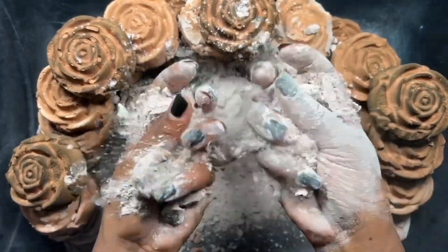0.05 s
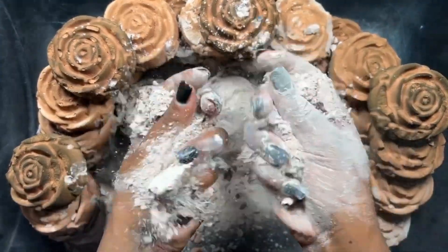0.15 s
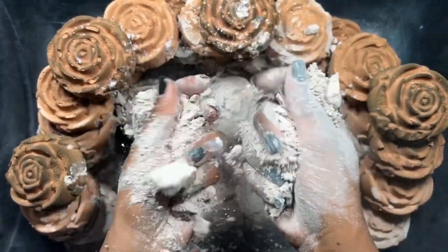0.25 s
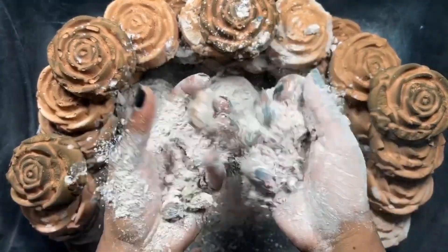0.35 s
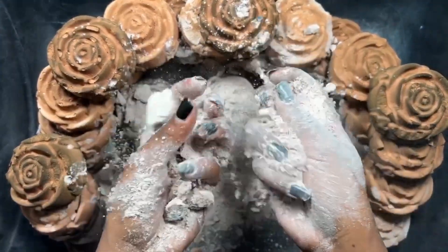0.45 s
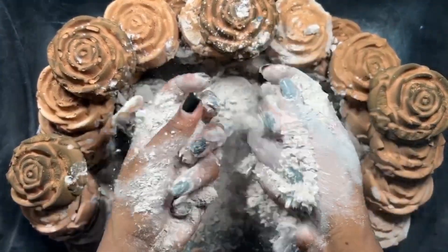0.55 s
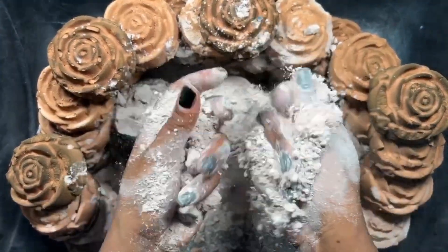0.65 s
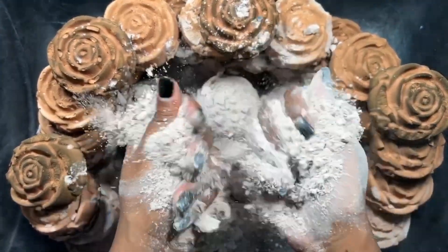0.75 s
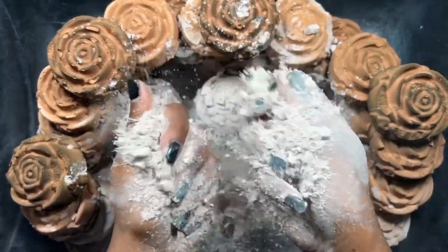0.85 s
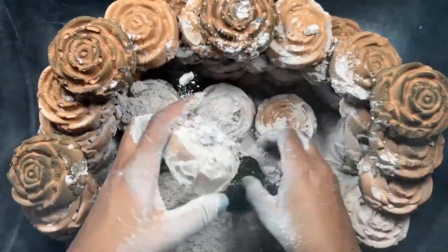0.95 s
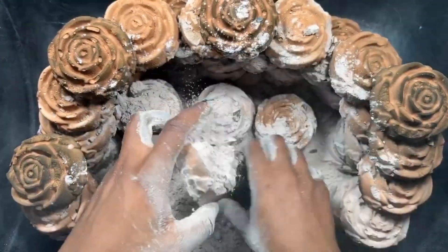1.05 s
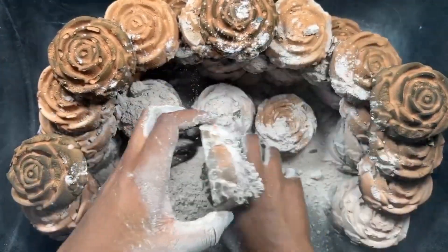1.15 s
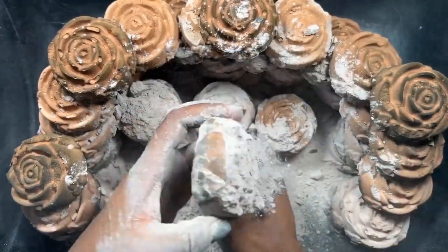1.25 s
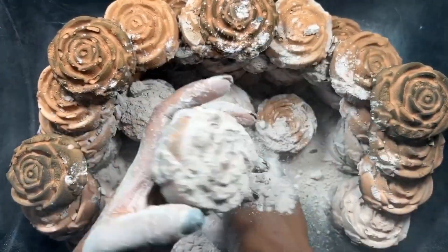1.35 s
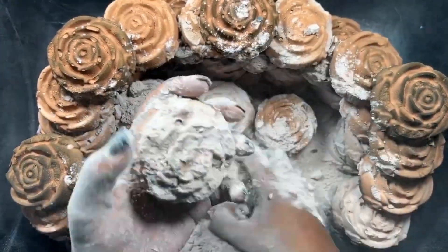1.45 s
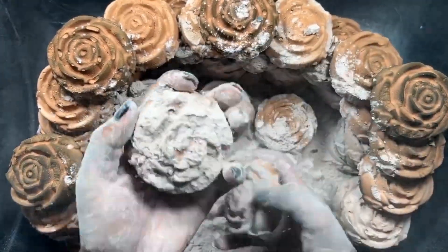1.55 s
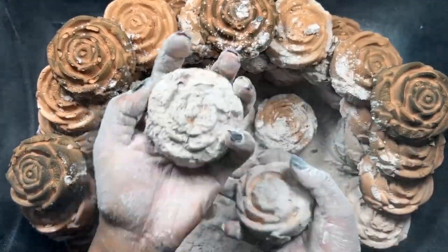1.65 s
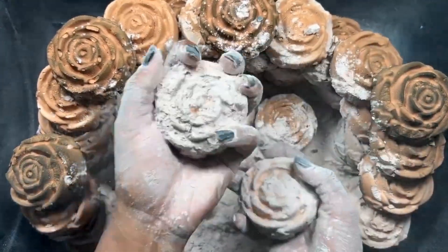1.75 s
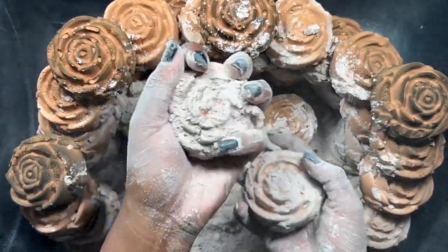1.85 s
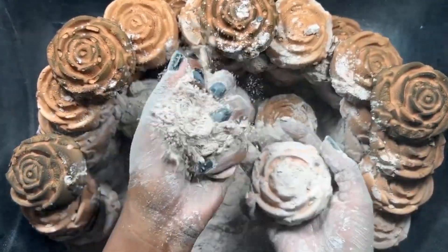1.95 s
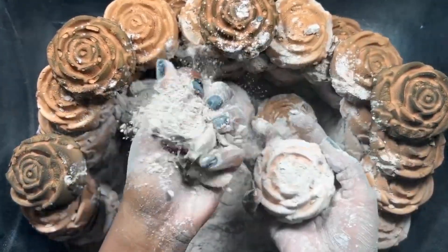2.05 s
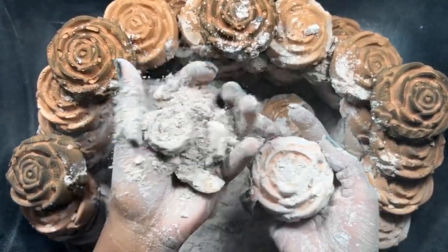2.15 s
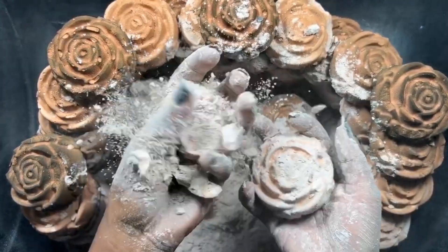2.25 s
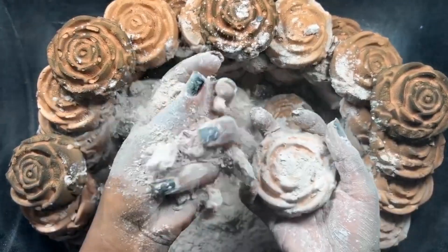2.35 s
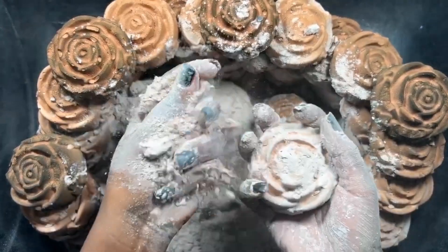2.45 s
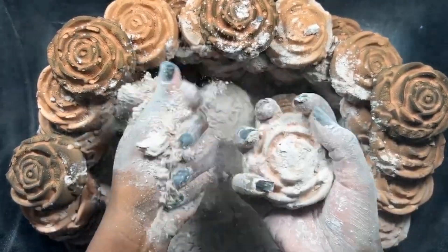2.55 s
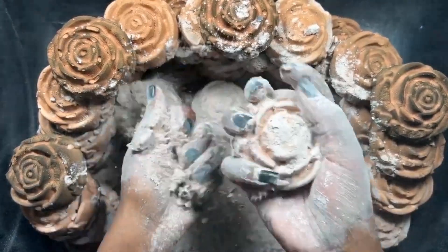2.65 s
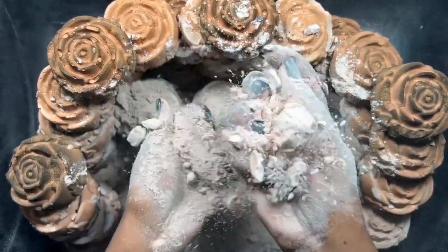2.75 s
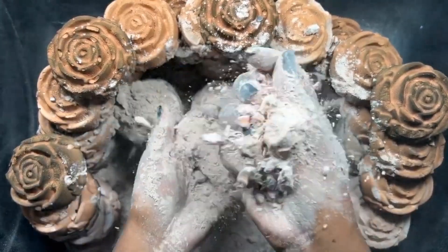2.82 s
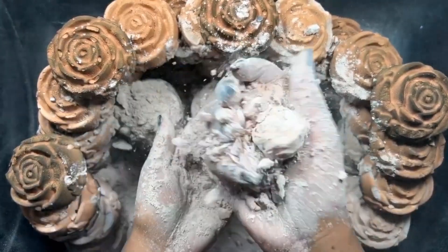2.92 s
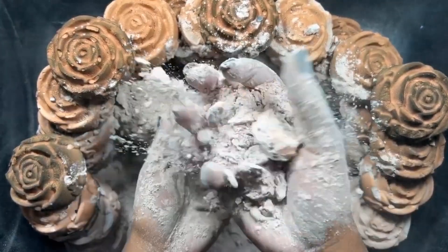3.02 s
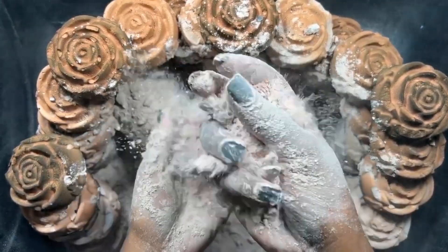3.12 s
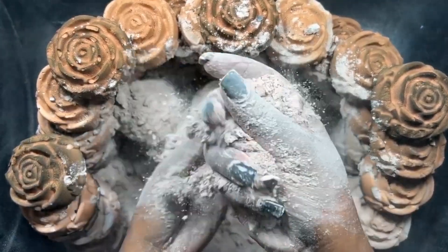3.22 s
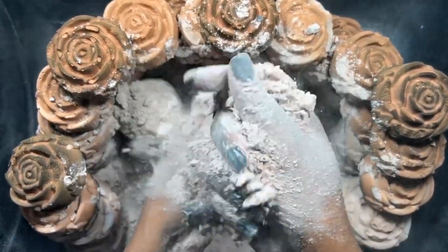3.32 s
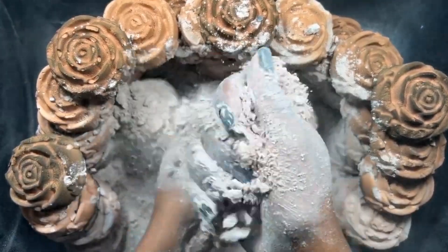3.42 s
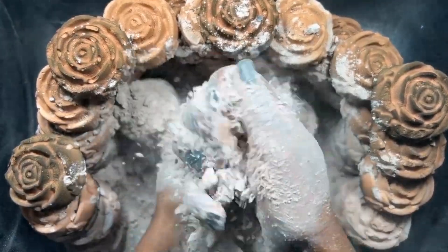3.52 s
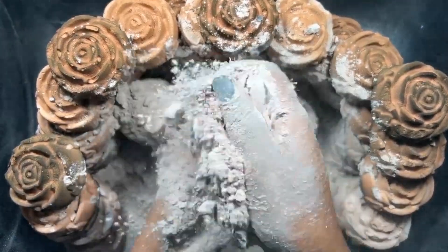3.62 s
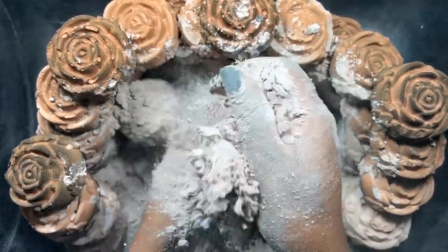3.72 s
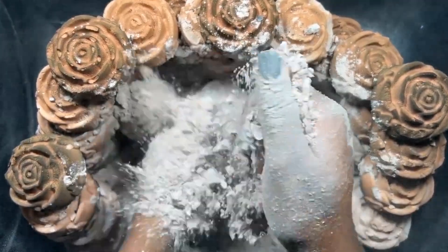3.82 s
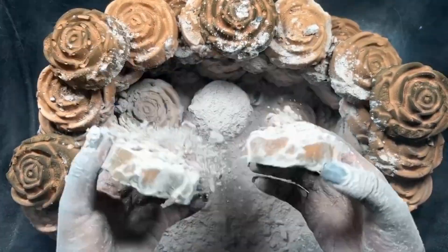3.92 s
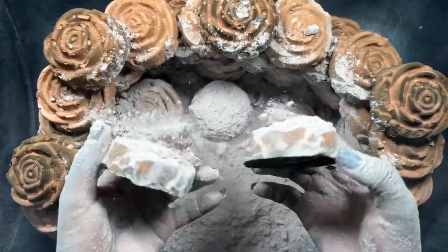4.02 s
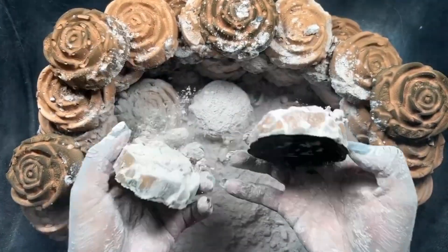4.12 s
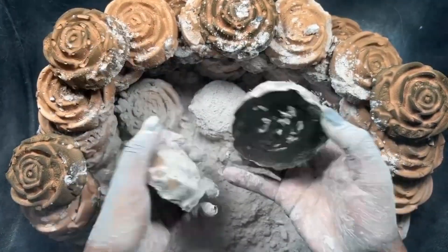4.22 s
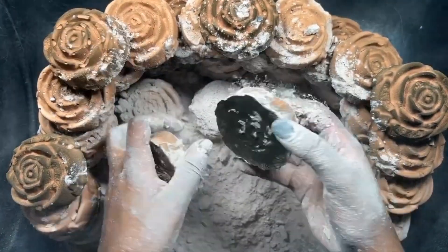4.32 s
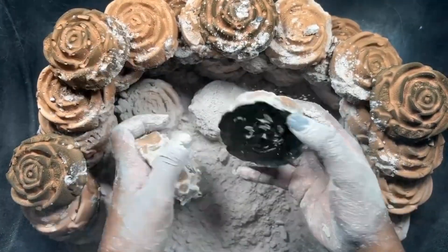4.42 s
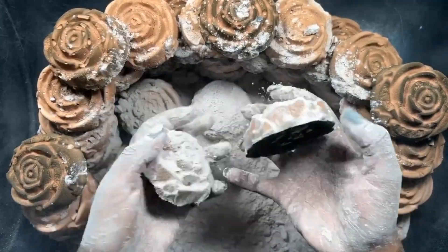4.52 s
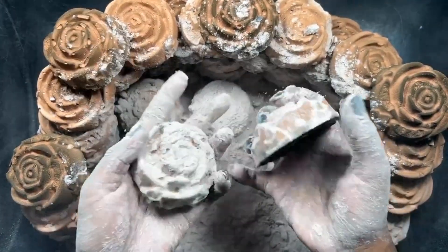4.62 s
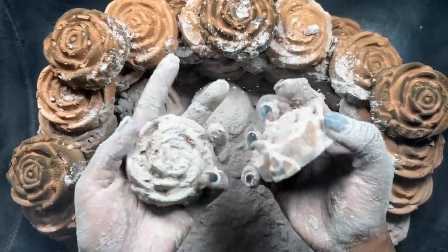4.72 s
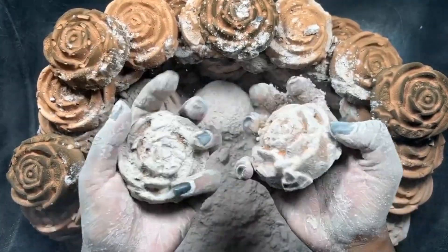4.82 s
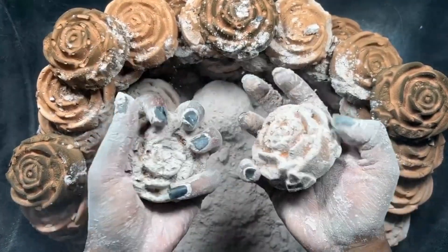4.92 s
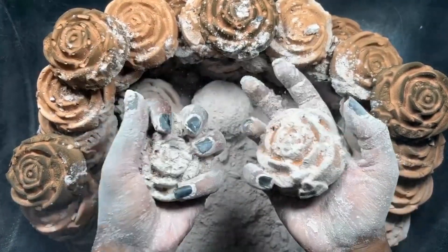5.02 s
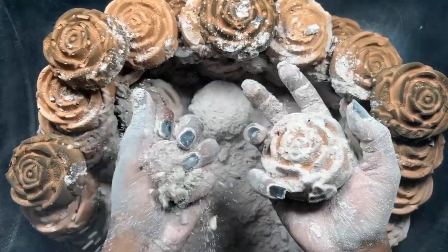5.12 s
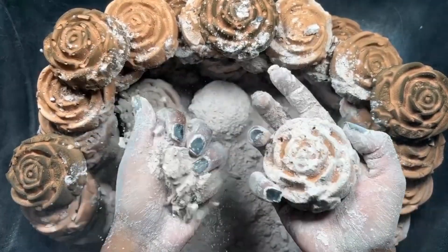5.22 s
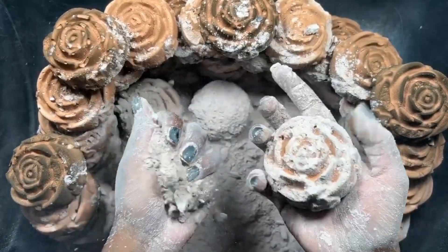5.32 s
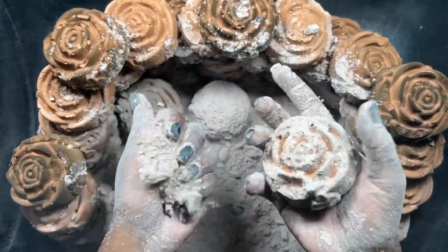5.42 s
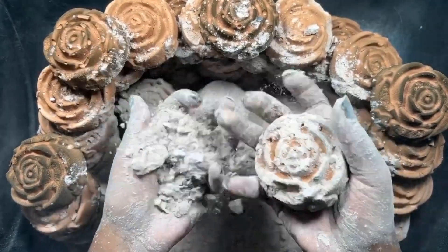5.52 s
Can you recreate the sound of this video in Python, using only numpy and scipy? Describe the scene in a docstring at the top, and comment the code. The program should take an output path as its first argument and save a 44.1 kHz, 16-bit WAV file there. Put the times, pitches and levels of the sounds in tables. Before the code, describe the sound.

Very close, dry stereo sound of hands crushing soft chalk over a table. From 0 to 0.25 s a tight cluster of loud, hollow mid-pitched cracks bursts out, with thick gritty crumbling; further strong cracks land near 0.44-0.55 and 0.9-1.0. Around 1.1-1.5 it thins to fine snaps and powder rubs. A double crack comes at 1.6, crisp ones at 1.93-1.97. From 2.1 to 2.9 the grinding rebuilds with smaller, duller knocks and a bright powdery swish at 2.7. Between 3 and 4 s, steady lower crunches cluster, densest at 3.7-4.0. From 4 to 4.9 crumbling drops away, leaving soft airy finger rubs and tiny ticks, brightest at 4.8. A sharp snap with a table thud hits at 5.07, then light crumbling fades by 5.5. Soft low thuds of falling bits, faint rumble and a slightly wavering low hum run underneath.

```python
"""At a table in a rumbling room, two hands squeeze and crumble soft chalk blocks.
Breaking lumps crack and knock as struck, damped resonances with bursts of noise; crumbs grind as
clumped random clicks ringing many small pieces; powder hisses between the fingers as dense grains
and noise, with a narrow ring from the cupped hand. Falling pieces excite the table's low modes,
over filtered-noise rumble and a slightly wavering low hum."""
import sys
import numpy as np
from scipy import signal
from scipy.fft import rfft, irfft, next_fast_len
from scipy.io import wavfile

SR = 44100
rng = np.random.default_rng(int(sys.argv[2]) if len(sys.argv) > 2 else 0)


def master_out(mix):
    """Clip the mix to full scale and print it as 16-bit PCM to the path in sys.argv[1]."""
    frames = np.transpose(np.atleast_2d(mix))
    ceiling = np.clip(frames, -1, 1)
    pcm = np.round(ceiling * 32767).astype(np.int16)
    wavfile.write(sys.argv[1], SR, pcm)


N = 245637

# Pieces dropping on the table. Each row: start in seconds, level in dB.
THUDS = [(0.047, -34), (0.441, -32.5), (0.608, -35), (0.869, -34.5), (1.928, -36.5), (1.98, -42),
         (2.558, -35), (2.701, -43), (2.859, -46), (3.141, -45), (3.569, -37), (5.066, -30.5), (5.325, -38)]
# Spectrum of sliding powder and of bright snaps. Each row: frequency in Hz, relative density in dB per Hz.
POWDER_SPECTRUM = [(700, -28), (1300, -18), (1900, -12), (2400, -14), (3200, -7.5), (5200, -7), (6200, 0),
                   (7200, -5.5), (8400, -6.5), (10200, -11), (11200, -6), (12300, -4.5), (14000, -8.5),
                   (15700, -6)]


def from_db(db):
    """Amplitude gain is ten to the power of a twentieth of the decibels."""
    return 10 ** (np.asarray(db) / 20)


def rms_one(x):
    """Normalise the mean power, so that the rms is one."""
    return x / np.sqrt(np.mean(x ** 2) + 1e-20)


def in_time(rows):
    """Linear interpolation turns table columns into curves with one value a sample."""
    s, *columns = np.transpose(rows)
    return [np.interp(np.arange(N) / SR, s, c) for c in columns]


def colour(x, points, share=1):
    """Zero-phase filtering: the spectrum is weighted by dB drawn straight over log frequency."""
    size = next_fast_len(N + 4096)
    hz = np.maximum(np.arange(size // 2 + 1) * SR / size, 1)
    point_hz, point_db = np.array(points).T
    db = np.interp(np.log(hz), np.log(point_hz), point_db)
    return irfft(rfft(x, size) * from_db(share * db), size)[:N]


def drift(rate_hz):
    """Low-passed noise of unit rms: a double pole at rate_hz leaves only slow chance."""
    step = 40  # samples between computed values
    r = np.exp(-2 * np.pi * rate_hz * step / SR)
    noise = rng.standard_normal(N // step + 2002)
    slow = signal.lfilter([1], [1, -2 * r, r * r], noise)[2000:]
    return np.interp(np.arange(N) / step, np.arange(len(slow)), rms_one(slow))


def ring(clicks, hz, t60):
    """Damped resonance: a unit click starts a sine of height near 1 that falls 60 dB in t60 seconds."""
    r = from_db(-60 / (t60 * SR))
    w = 2 * np.pi * min(hz, 15000) / SR
    return signal.lfilter([0, np.sin(w)], [1, -2 * r * np.cos(w), r * r], clicks + 1e-18)


def soft_ring(clicks, hz, cycles):
    """Cascaded resonance: two equal passes, each falling 60 dB in `cycles`, swell before dying; peak near 1."""
    slope = np.diff(clicks, prepend=0) * SR / (2 * np.pi * hz)
    once = ring(slope, hz, cycles / hz)
    return ring(once, hz, cycles / hz) * 2 * np.e * np.log(1000) * hz / (cycles * SR)


def grains(per_s, spread_db):
    """Random impulse train: independent clicks of exponentially spread dB and either sign."""
    sizes = from_db(spread_db * np.minimum(rng.exponential(1, N), 5))
    signs = rng.choice([-1, 1], N)
    return sizes * signs * (rng.random(N) < per_s / SR)


def following(squeeze_db, level_db, share):
    """Proportional coupling in dB: level_db at a middling squeeze, then a share of the squeeze's swing."""
    middling_db = -52
    return level_db + share * (squeeze_db - middling_db)


def shaking(squeeze_db):
    """Incoherent power addition: the room, the worked table and slow jolts from thuds give the rumble's dB."""
    room_db, shake_db, shake_follows = -60, -54.5, 0.67
    jolt_db, swell_s, settle_s = -14.5, 0.027, 0.27  # jolt re the thud's listed level
    t = np.arange(N) / SR
    power = from_db(room_db) ** 2 + from_db(following(squeeze_db, shake_db, shake_follows)) ** 2
    for s, db in THUDS:
        swell = np.clip((t - s) / swell_s, 0, 1)
        power += from_db(db + jolt_db) ** 2 * swell * np.exp(-np.abs(t - s) / settle_s)
    return 10 * np.log10(power)


def rumble_and_hum(rumble_db):
    """Filtered noise under a level curve makes the rumble; a phase-modulated sine makes the hum."""
    # Spectrum of the rumble. Each row: frequency in Hz, relative density in dB per Hz.
    rumble_spectrum = [(20, -35), (35, -10.5), (52, -4), (78, 3), (100, -5.5), (145, -4.5), (190, -19.5),
                       (520, -14.5), (640, -40), (900, -44), (1300, -46)]
    hum_hz, hum_db = 121.2, -59
    low = rms_one(colour(rng.standard_normal(N), rumble_spectrum))
    phase = 2 * np.pi * hum_hz * np.arange(N) / SR + 0.39 * drift(3.9)
    hum = np.sqrt(2) * np.sin(phase)
    return from_db(rumble_db) * low + from_db(hum_db + 1.1 * drift(6.0)) * hum


def thuds():
    """Modal excitation: falling pieces strike the table's low modes."""
    # Table modes. Each row: frequency in Hz, level in dB, 60 dB fall of one resonance pass in seconds.
    table_modes = [(86.5, -4, 0.096), (138, 3.5, 0.071), (295.5, -1, 0.054)]
    blows = np.zeros(N)
    for s, db in THUDS:
        blows[round(s * SR)] = from_db(db - 7.0)
    return sum(from_db(db) * soft_ring(blows, hz, t60 * hz) for hz, db, t60 in table_modes)


def swells():
    """Gaussian envelopes: the summed power of soft, bell-shaped rubs of the fingers."""
    # Rubs through powder. Each row: middle in seconds, length in seconds, peak level in dB.
    rubs = [(0.033, 0.45, -47.5), (0.42, 0.13, -54), (0.653, 0.088, -52), (0.826, 0.23, -50.5),
            (1.115, 0.053, -48), (1.18, 0.033, -53), (1.27, 0.07, -60), (1.455, 0.027, -55.5),
            (1.63, 0.17, -52.5), (1.783, 0.052, -45.5), (1.966, 0.097, -47.5), (2.323, 0.13, -52.5),
            (2.455, 0.16, -57.5), (2.593, 0.092, -51), (2.721, 0.063, -40), (2.82, 0.12, -58),
            (3.16, .14, -51), (3.6, 0.084, -49), (3.924, .05, -50), (4.015, 0.25, -47), (4.217, 0.11, -47),
            (4.299, 0.17, -49), (4.413, 0.097, -54.5), (4.49, 0.056, -56.5), (4.566, 0.063, -51),
            (4.661, 0.12, -46.5), (4.74, 0.06, -47.5), (4.794, 0.096, -42.5), (4.876, 0.13, -49.5),
            (5.073, 0.025, -40.5), (5.111, 0.067, -49.5), (5.26, 0.17, -54), (5.493, 0.049, -62)]
    t = np.arange(N) / SR
    return sum(from_db(db) ** 2 * np.exp(-(4 * (t - s) / length) ** 2) for s, length, db in rubs)


def rubbing(squeeze_db):
    """Power addition of the rubs and a trickle that follows the squeeze gives the powder's level in dB."""
    trickle_db = following(squeeze_db, level_db=-57.0, share=0.67)
    return 10 * np.log10(swells() + from_db(trickle_db) ** 2)


def powder(level_db):
    """Granular noise: countless sliding grains hiss in bands whose levels drift independently."""
    sand = rms_one(grains(9000.0, spread_db=5.0)) + 1.3 * rng.standard_normal(N)
    sand = colour(sand, POWDER_SPECTRUM)
    edges = np.geomspace(600, 17000, 12)
    patches = np.zeros(N)
    for k, band in enumerate(zip(edges, edges[1:])):
        band_filter = signal.butter(2, band, "band", fs=SR, output="sos")
        sign = (-1) ** k  # neighbouring bands alternate in sign
        patches += sign * from_db(0.86 * drift(20.0)) * signal.sosfilt(band_filter, sand)
    return from_db(level_db + 1.2 * drift(35.0)) * rms_one(patches)


def cup():
    """Cavity resonance: rubbing noise rings the hollow of the cupped hand as a narrow, patchy band."""
    hollow_hz, width_hz, level_db = 1830, 290, -20  # width of one pass; level re the rub
    r, w = np.exp(-np.pi * width_hz / SR), 2 * np.pi * hollow_hz / SR
    band = rng.standard_normal(N)
    for _ in range(2):
        band = signal.lfilter([1, 0, -1], [1, -2 * r * np.cos(w), r * r], band)
    return np.sqrt(swells()) * from_db(level_db + 2.1 * drift(11.0)) * rms_one(band)


def crumbs(clicks, level_db, low_hz, high_hz, cycles):
    """Size sets pitch: each knock rings a chance three in ten of the small resonant pieces."""
    # Spectrum of crumbling chalk. Each row: frequency in Hz, relative density in dB per Hz.
    crumb_spectrum = [(110, -10), (180, -11), (289, 1.5), (595, -5), (904, 0.5), (1020, -7.5), (1110, -2.5),
                      (1240, -11), (2830, -13), (5000, -23), (6500, -49), (11000, -120)]
    rings = np.zeros(N)
    for hz in np.geomspace(low_hz, high_hz, 10):
        shaken = clicks * (rng.random(N) < .3)
        rings += soft_ring(shaken, hz, cycles) * hz  # even power per Hz before colouring
    return from_db(level_db - 2.0) * rms_one(colour(rings, crumb_spectrum))


def grinding(coarse_db, fine_db):
    """Common excitation: clumped random knocks stir coarse and fine crumbs together."""
    clicks = grains(700.0 * from_db(4.4 * drift(20.0)), spread_db=3.0)
    finer = clicks + 0.23 * grains(5000.0, spread_db=2.0)
    coarse = crumbs(clicks, coarse_db, 223.3, 1228, cycles=11.1)
    return coarse + crumbs(finer, fine_db, 1397, 4520, cycles=12.0)


def chips(squeeze_db):
    """Random fracture: small chips break at chance moments, louder under a harder squeeze; rows as for lumps."""
    count, over_squeeze_db, spread_db = 55, 7.5, 3
    low_hz, high_hz, mean_split_db, mean_snap_db = 376, 2145, -14.5, -23.5
    when, size, pitch, dryness, brightness = rng.random((count, 5)).T
    s = when * (N - 1) / SR
    peak_db = squeeze_db[(s * SR).astype(int)] + over_squeeze_db - spread_db * np.log(size + 0.018)
    hz = low_hz * (high_hz / low_hz) ** pitch
    split_db = mean_split_db + 12.2 * (dryness - .5)
    snap_db = mean_snap_db + 12.8 * (brightness - .5)
    return list(zip(s, peak_db, hz, split_db, snap_db))


def cracks(breaks):
    """Brittle fracture: a click in a dying spray rings the lump's modes, with a dry split and a snap of hiss."""
    # Lump modes. Each row: multiple of the pitch, level in dB, cycles for one resonance pass to fall 60 dB.
    lump_modes = [(.65, -9.5, 5.8), (1.002, -4, 13.1), (1.35, -7, 9.8), (2.0, -16, 13)]
    # Spectrum of the dry split. Each row: frequency in Hz, relative density in dB per Hz.
    edge_spectrum = [(700, 1), (1400, 2), (2200, -0.5), (3500, -4), (5000, -9), (9000, -28)]
    size = 3072  # samples a break
    t = np.arange(size) / SR
    # the fracture front: noise that rises in about a millisecond and dies within a few
    rise = 1 - np.exp(-t / 0.00092)
    split_shape = rise * (np.exp(-t / 0.0032) + 0.31 * np.exp(-t / 0.031))  # with a weaker, longer tail
    snap_shape = rise * np.exp(-t / 0.0044)
    knock, split, snap = np.zeros((3, N + size))
    for s, peak_db, pitch_hz, split_db, snap_db in breaks:
        at = round(s * SR)
        span = slice(at, at + size)
        spray, split_noise, snap_noise = rng.standard_normal((3, size))
        clicks = .11 * spray * np.exp(-t / .012) * (rng.random(size) < 2500.0 / SR)
        clicks[30] = 1  # the main click
        for multiple, db, cycles in lump_modes:
            gain = from_db(peak_db - 3.0 + db + rng.normal(0, 1.4))  # modes differ by chance
            knock[span] += gain * soft_ring(clicks, pitch_hz * multiple, cycles)
        split[span] += from_db(peak_db + split_db + 10.0) * split_noise * split_shape
        snap[span] += from_db(peak_db + snap_db + 12.5) * snap_noise * snap_shape
    return knock[:N] + colour(split[:N], edge_spectrum) + colour(snap[:N], POWDER_SPECTRUM)


def stereo(x):
    """Decorrelation: a side signal blends two noise-smeared copies in an ever-changing mix, added left, cut right."""
    # Stereo width. Each row: frequency in Hz, side minus mid in dB.
    width = [(60, -23), (200, -11), (400, -4.5), (800, -3), (1400, -4), (3000, -4.5), (6500, -10),
             (9300, -7.5), (10500, -81), (15000, -46)]
    # Balance. Each row: frequency in Hz, left minus right in dB.
    tilt = [(60, -4), (110, 4.5), (200, -3), (380, 3), (700, 0.5), (1290, 0.5), (2380, -0.5), (4400, -0.5),
            (8120, 0), (15000, 0.0)]
    t = np.arange(1500) / SR
    smears = rng.standard_normal((2, len(t))) * np.exp(-t / 0.0033)
    one, other = (signal.fftconvolve(x, s / np.sqrt(np.sum(s ** 2)))[:N] for s in smears)
    turn = 3.17 * drift(3.87)  # mixing angle in radians
    side = colour(one * np.cos(turn) + other * np.sin(turn), width)
    return np.array([colour(x + side, tilt, share=.5), colour(x - side, tilt, share=-.5)])


def scene():
    """Superposition: room, table, powder, crumbs and lumps add, and one squeeze curve drives many levels."""
    # Squeeze of the hands. Each row: time in seconds, coarse crumb level in dB, fine minus coarse in dB.
    squeeze = [(0.0, -42.5, 1), (0.17, -43, -4.5), (0.8, -47, -2.5), (0.94, -49.5, -14), (1.12, -56, -1.5),
               (1.32, -58.5, -4), (1.52, -65.5, -3.5), (1.71, -56, -6), (1.97, -61.5, -1), (2.13, -55, -4),
               (2.42, -52, 0.5), (2.56, -49, -4.5), (3.7, -50, -3), (3.95, -47.5, -4), (4.11, -55, -5.5),
               (4.34, -65.5, 12), (4.47, -59, -4), (4.58, -72.5, -5), (4.95, -69, 1), (5.15, -59.5, 1.5),
               (5.32, -53, -7), (5.57, -65, 1)]
    # Lumps breaking. Each row: start in seconds, level in dB, lump pitch in Hz,
    # dry split in dB and bright snap in dB, both relative to the level.
    lump_breaks = [(0.028, -27, 1030, -17, -11.5), (0.056, -8, 1220, -18, -35),
                   (0.065, -22.5, 690, -29, -31), (0.098, -18, 1440, -23, -22),
                   (0.125, -21, 1020, -16, -25), (0.135, -30.5, 2430, -3, -6.5),
                   (0.172, -11.5, 974, -26, -42), (0.182, -15, 930, -22.5, -26),
                   (0.187, -10.5, 1090, -22, -48), (0.197, -15, 849, -34, -33),
                   (0.209, -16, 1097, -33, -42), (0.246, -24.5, 950, -13, -31), (0.396, -28, 960, -11, -22),
                   (0.403, -30, 635, -7.5, -9.5), (0.437, -12, 1034, -28, -24),
                   (0.475, -21, 714, -10.5, -21.5), (0.502, -25.5, 1090, -13, -23),
                   (0.536, -19, 1020, -19, -37), (0.598, -32.5, 1020, -9, -5.5),
                   (0.635, -43.5, 490, -25, 3), (0.664, -47, 910, -20, 4), (0.839, -32, 1150, -15, -25),
                   (0.871, -30, 438, -8, -28), (0.891, -31.5, 450, -8, -18), (0.904, -19, 1055, -19, -27),
                   (0.939, -25, 930, -23, -22), (0.965, -20, 830, -18, -17), (1.044, -34, 3200, -27, -10),
                   (1.082, -34.5, 3000, -27, -10), (1.103, -34, 1340, -8.5, -12),
                   (1.116, -42, 427, -20, 4.5), (1.163, -30, 504, -15, -28), (1.169, -24, 2900, -17, -18.5),
                   (1.243, -38.5, 487, -9.5, -22), (1.59, -22, 917, -21, -39), (1.591, -27, 1500, -22, -39),
                   (1.614, -33, 1680, -7, -20), (1.661, -39.5, 500, -4.5, 0),
                   (1.849, -43.5, 1150, -11, -10), (1.933, -20.5, 1615, -6, -14.5),
                   (1.961, -36, 964, -12, -25), (1.972, -20.5, 870, -11, -15.5),
                   (1.989, -29.5, 864, -26, -15), (2.026, -30.5, 2760, -18, -17),
                   (2.089, -38, 1010, -6, -27), (2.172, -39.5, 1020, -4, -11), (2.331, -39, 458, -2.5, -11),
                   (2.416, -34, 713, -9, -17), (2.556, -33, 400, -5.5, -20), (2.579, -34.5, 980, -12, -18),
                   (2.609, -36, 523, -14, -20), (2.651, -35.5, 560, -21, -25), (2.676, -30, 517, -26, -31),
                   (2.705, -26.5, 580, -6, -21), (2.715, -30.5, 1600, 1, -16), (2.737, -29, 674, -16, -12),
                   (2.845, -37, 890, -14.5, -18), (2.896, -40, 1590, -10, -22),
                   (2.94, -25.5, 677, -16, -33), (3.097, -32.5, 875, -26, -25),
                   (3.137, -34.5, 515, -7, -10), (3.167, -28.5, 840, -12, -26),
                   (3.234, -35, 3500, -14, -11.5), (3.266, -39, 388, 0.5, -6.5),
                   (3.511, -35, 620, -7.5, -23), (3.544, -36, 870, -4.5, -20),
                   (3.565, -24.5, 833, -13.5, -22), (3.622, -34.5, 727, -3.5, -0.5),
                   (3.735, -28.5, 700, -9, -8.5), (3.759, -33.5, 490, -2, -24),
                   (3.795, -24.5, 986, -18, -28), (3.802, -25.5, 468, -8.5, -21),
                   (3.866, -32.5, 475, -7, -17), (3.891, -33, 676, -26, -30), (3.918, -30, 414, -19, -19),
                   (3.945, -28, 378, -23, -30), (3.961, -32, 467, -15, -27), (4.051, -39.5, 705, -6.5, -23),
                   (4.089, -36.5, 470, -16, -9.5), (4.327, -40.5, 1040, -1.5, -12),
                   (4.401, -43, 1700, -6, -9), (4.434, -36.5, 507, -14.5, -17),
                   (4.504, -38.5, 447, -8.5, -15), (4.954, -45.5, 430, -1.5, 1),
                   (5.069, -23.5, 1550, -9, -21), (5.074, -37, 352, -14, -2), (5.112, -37.5, 880, -6, -15),
                   (5.248, -30.5, 453, -16, -27), (5.374, -31.5, 446, -14.5, -22),
                   (5.475, -42.5, 493, -10, -12)]
    squeeze_db, fine_db = in_time(squeeze)
    background = rumble_and_hum(shaking(squeeze_db)) + thuds()
    fingers = powder(rubbing(squeeze_db)) + cup()
    crumbling = grinding(squeeze_db, squeeze_db + fine_db)
    breaking = cracks(lump_breaks + chips(squeeze_db))
    return stereo(background + fingers + crumbling + breaking)


def record(dry):
    """Steep low-pass filtering: the treble is at least 75 dB down from 16050 Hz upward."""
    low_pass = signal.cheby2(22, 75, 16050, fs=SR, output="sos")
    return signal.sosfilt(low_pass, dry)


dry = scene()
out = record(dry)
master_out(out)
```